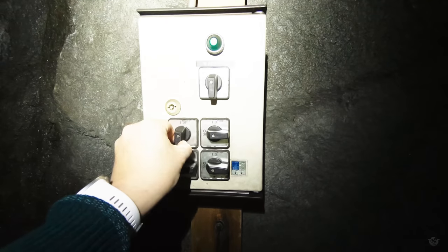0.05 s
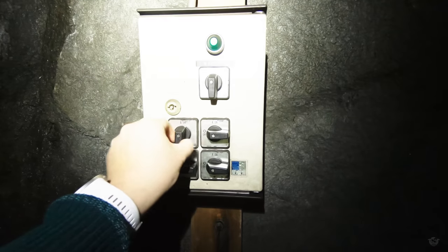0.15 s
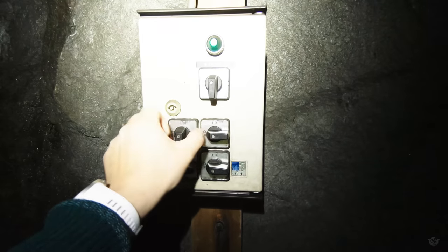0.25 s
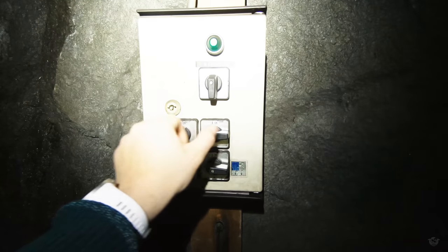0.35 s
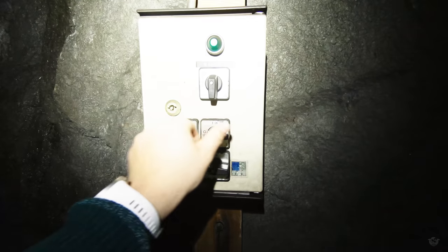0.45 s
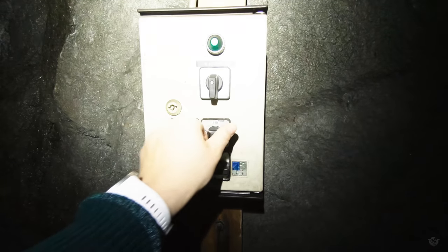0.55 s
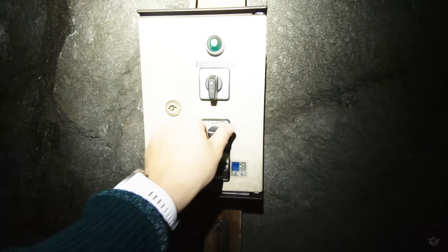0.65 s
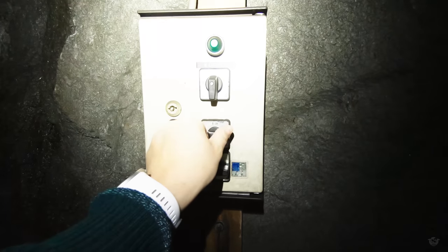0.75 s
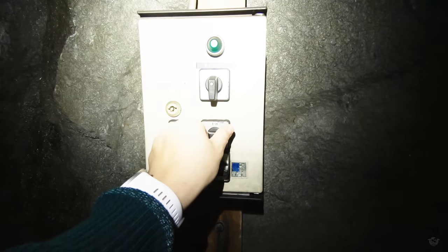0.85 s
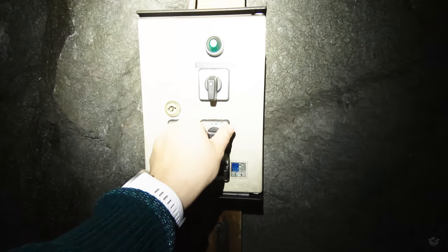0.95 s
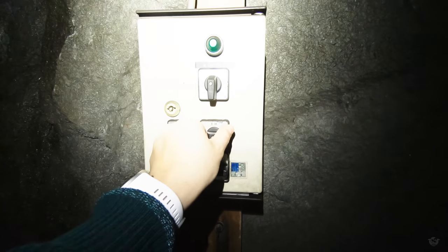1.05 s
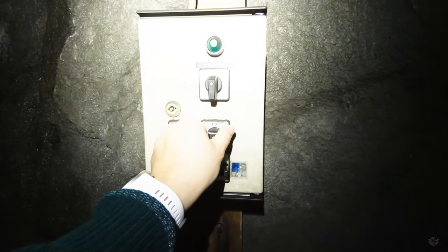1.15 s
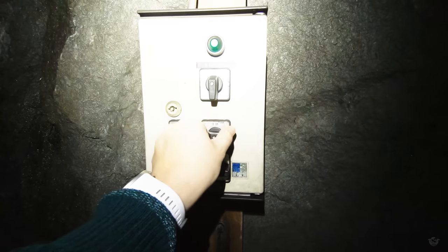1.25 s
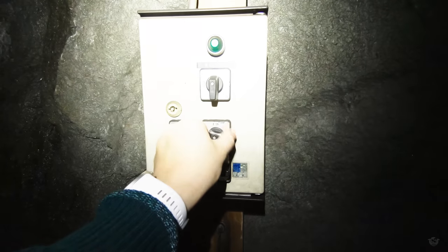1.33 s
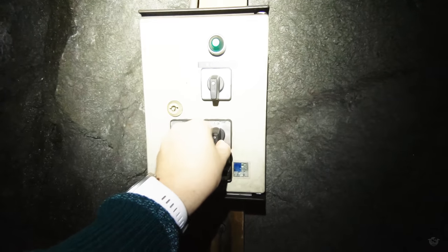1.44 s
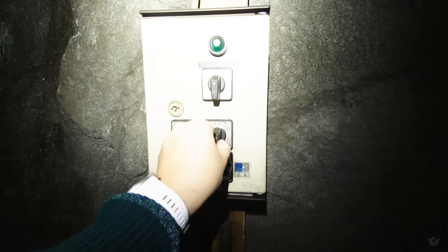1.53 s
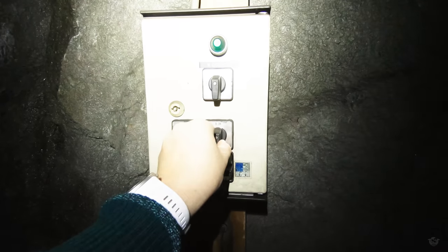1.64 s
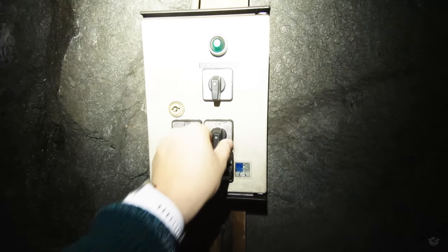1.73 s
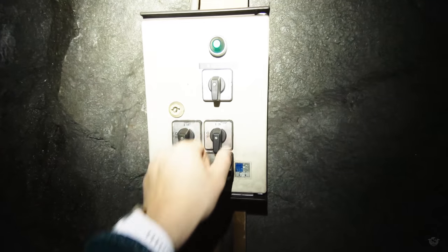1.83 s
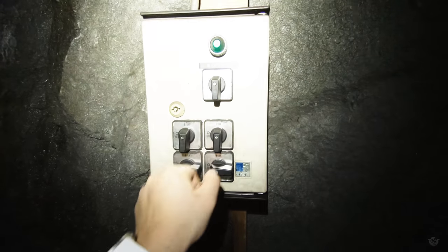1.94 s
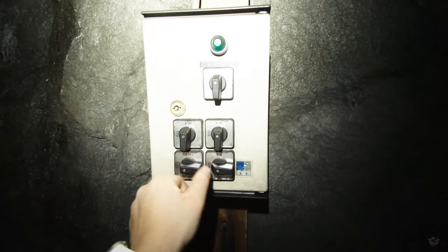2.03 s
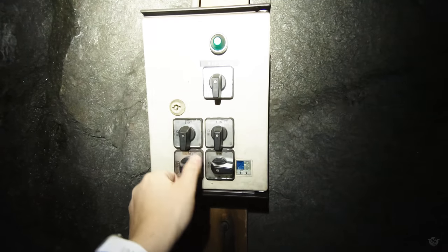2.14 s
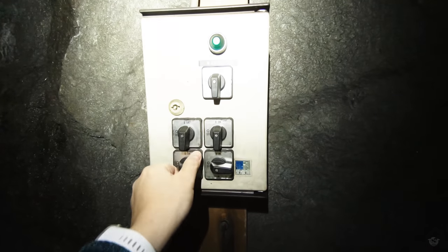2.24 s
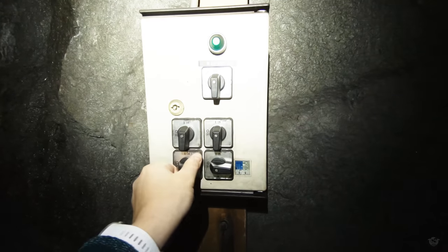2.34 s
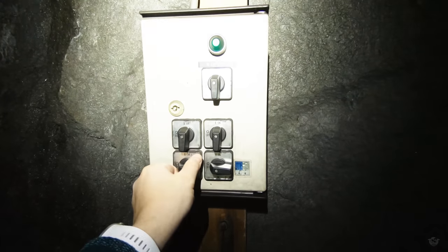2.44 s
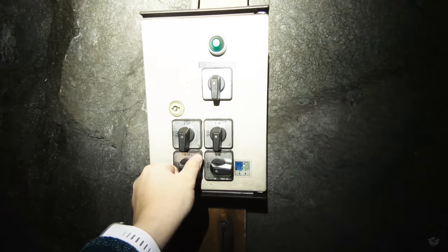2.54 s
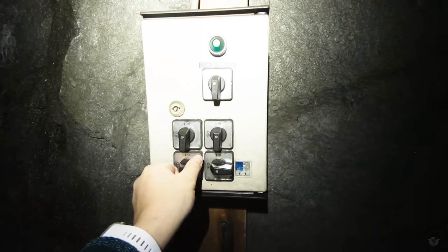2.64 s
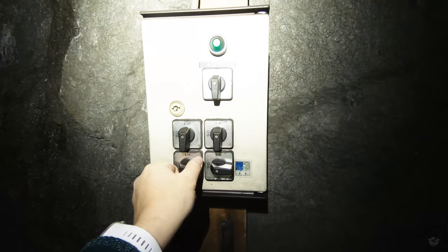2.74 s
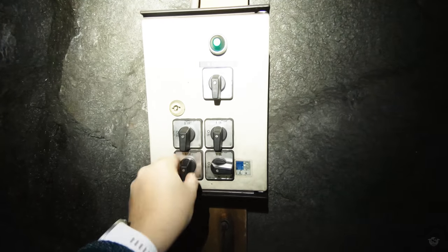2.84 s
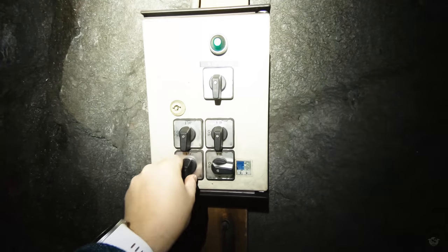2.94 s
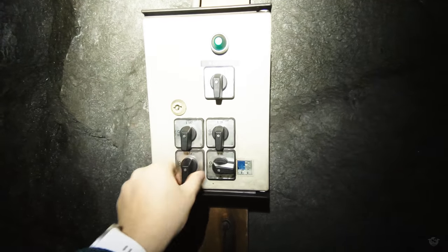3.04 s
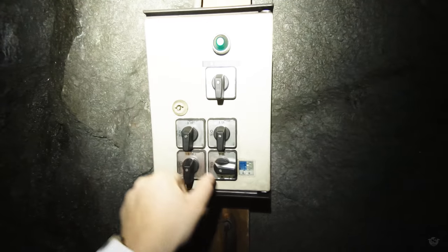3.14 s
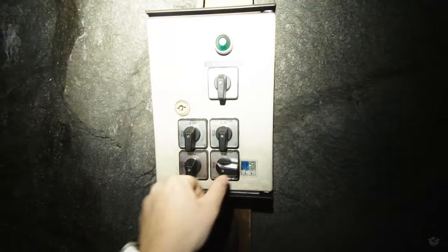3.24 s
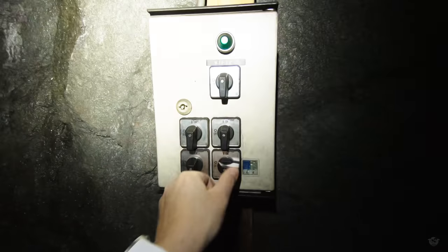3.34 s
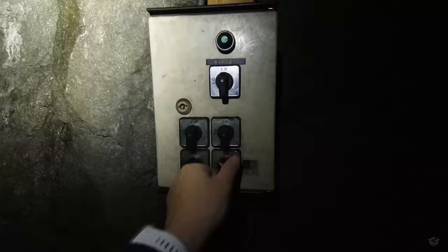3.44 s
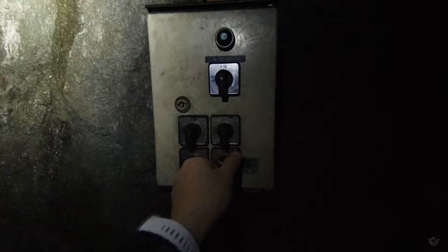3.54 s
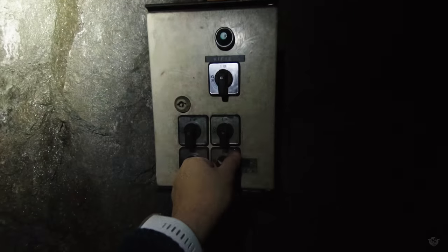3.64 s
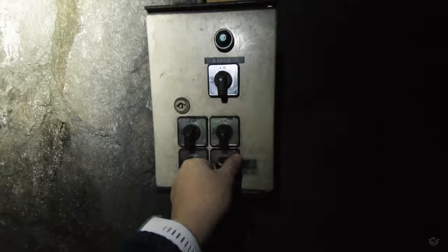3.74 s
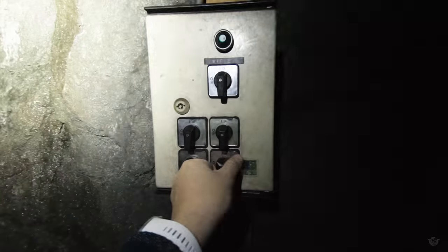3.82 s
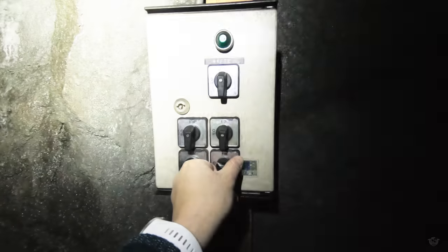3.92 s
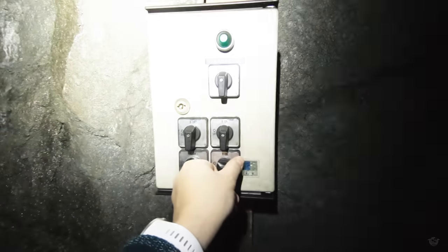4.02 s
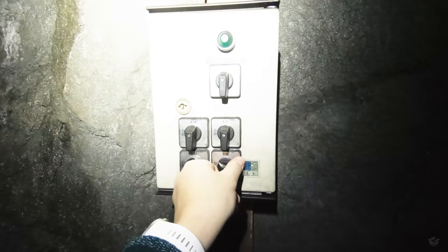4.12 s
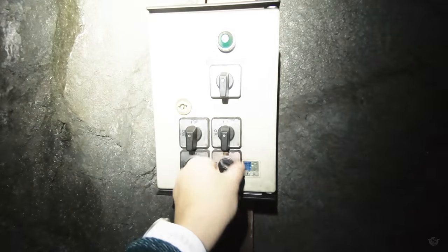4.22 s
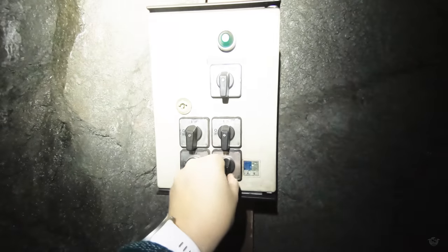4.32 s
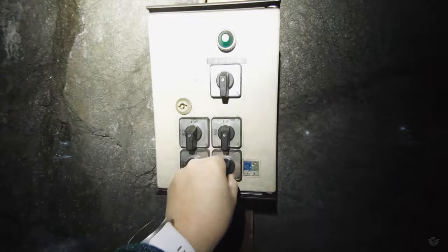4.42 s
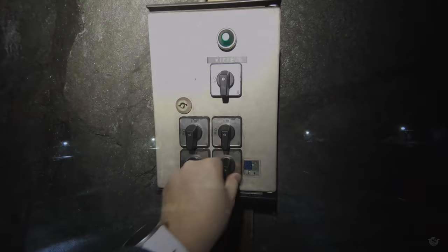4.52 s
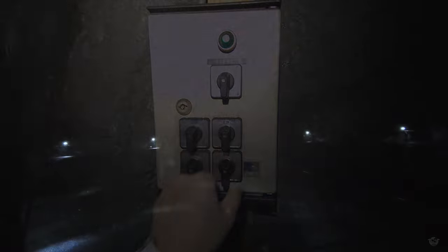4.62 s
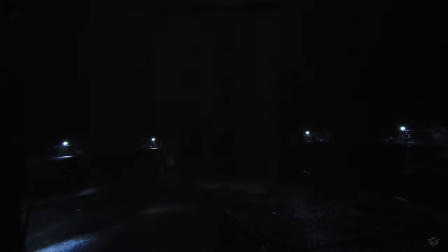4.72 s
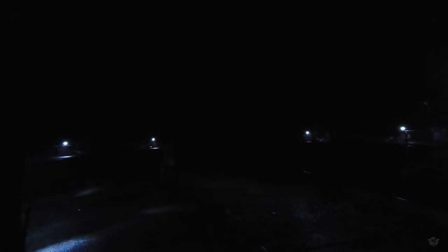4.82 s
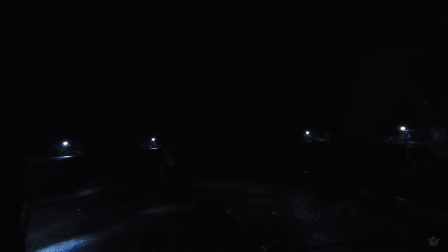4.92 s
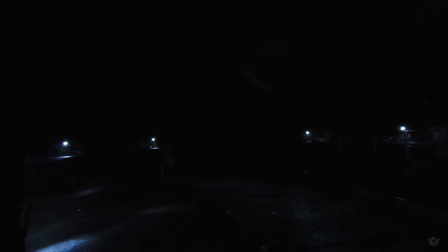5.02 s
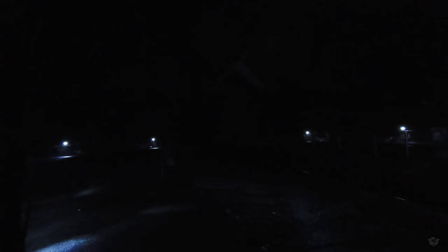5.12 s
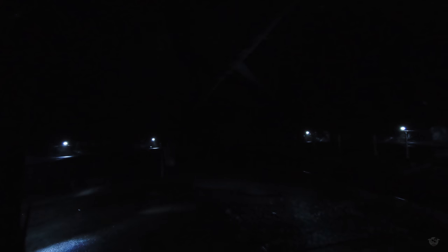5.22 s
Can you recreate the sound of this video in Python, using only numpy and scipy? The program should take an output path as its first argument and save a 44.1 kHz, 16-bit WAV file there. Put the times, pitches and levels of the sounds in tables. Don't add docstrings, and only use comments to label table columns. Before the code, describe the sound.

Three sharp rotary switch clacks on a steel box ring through a rock tunnel, over low air rumble, before a shoe scuffs grit.

```python
import sys
import numpy as np
from scipy import signal
from scipy.fft import rfft, irfft
from scipy.io import wavfile
from scipy.ndimage import uniform_filter1d

SR = 44100
rng = np.random.default_rng(int(sys.argv[2]) if len(sys.argv) > 2 else 0)


def unload_audio(sound):
    columns = np.transpose(np.atleast_2d(sound))
    steps = np.round(np.clip(columns, -1, 1) * 32767)
    wavfile.write(sys.argv[1], SR, steps.astype(np.int16))


def nominal_scale(level):
    x = np.asarray(level, float) / 20
    return 10 ** x


N = 232460
LEAD = 8820

# (time [s], rattle level [dB], thump level [dB], wall throb level [dB], tunnel hiss level [dB])
SNAPS = [
    (-.087, -11, -32, -31, -45.5),
    (1.4885, -15, -18.5, -35.5, -47.5),
    (2.9122, -15.5, -16.5, -29.5, -46.5),
    (4.3402, -14, -19, -42.5, -53),
]
# (rattle decay [s], thump pitch [Hz], throb pitch [Hz], nearest wall level [dB], throb fade [dB/s])
SWITCHES = [
    (0.0049, 207, 121.4, -40, -11.5),
    (0.011, 210, 122, -23, 3),
    (0.0082, 193, 117.6, -33.5, -9),
    (0.01, 165, 115, -33.5, -12),
]
# (frequency [Hz], peak level [dB], t60 [s], delay [s])
UPPER_RIGHT = [(658, -13.5, 0.04, 0.002345), (981, 5, 0.012, 0.00087), (1130, -20, 0.025, 0.0017),
               (1307, 1, 0.012, 0.00238), (1590, -10, 0.014, 0.0012), (1924, 5.5, 0.01, 0.00095),
               (2270, -3, 0.01, 0.0005), (2900, -11.5, 0.037, 0.002), (3600, 4, 0.0072, .0015),
               (4170, 0.5, 0.0093, 0.001317), (4580, -10.5, 0.0097, 0.00096), (5054, -2.5, 0.011, 0.00026),
               (6060, -10.5, 0.0086, 0.00016), (6920, -5, 0.0065, 0.00022), (9100, -3, 0.0059, 0.00036),
               (10260, -4.5, 0.0063, 0.000397), (12200, -11, 0.0043, 0.000366)]
LOWER_LEFT = [(617, -12.5, 0.059, 0.00299), (823, 2.5, 0.022, 0.00216), (1265, -21, 0.11, 0.00081),
              (1410, 5, 0.015, 0.00106), (2235, -19, 0.013, 0.00096), (2830, -14, 0.032, 0.000905),
              (3210, -9.5, 0.015, 0.00162), (3780, -2.5, 0.012, 0.00202), (4400, -2, 0.013, 0.000943),
              (5230, 7, 0.0048, 0.0004), (6440, 2, 0.0061, 0.00036), (7170, -13, 0.0069, 0.0051),
              (8860, -17.5, 0.0046, 0.000291), (10160, -1.5, 0.0033, 0.000406),
              (13500, -26.5, 0.0045, .0004)]
LOWER_RIGHT = [(430, -17, 0.047, 0.00407), (626, -11, 0.021, 0.00252), (950, -10.5, 0.02, 0.00181),
               (1313, -9.5, 0.031, 0.00142), (780, -10.5, 0.024, 0.0024), (1063, -19, 0.065, 0.002),
               (1440, -3.5, 0.017, 0.0013), (2190, 3, 0.008, 0.001175), (2900, 1, 0.0071, 0.0005),
               (3800, -5.5, 0.01, 0.00055), (4630, -6.5, 0.016, 0.0014), (5470, 8, 0.006, 0.000218),
               (6440, -5, 0.0041, 0.000313), (7450, -9.5, 0.0051, 0.00073), (9650, -1, 0.0046, .0006),
               (13400, -20, 0.0044, 0.000865)]
# (frequency [Hz], density [dB/Hz])
CRACK = [(240, 4), (400, -9), (1330, -4.5), (2520, -6.5), (3680, -13.5), (5380, -18), (6860, -22),
         (7740, -22.5), (10300, -22.5), (13800, -86), (15100, -74)]

# (frequency [Hz], t60 [s], level [dB])
LID_MODES = [(63.96, 1, -47.5), (250.5, 0.136, -37), (322.6, .7, -48), (330.7, 0.16, -41.5),
             (480, .03, -37)]
LID_HIGH_DB = [10, 4, -9, -5]

# (delay [s], length [s], level relative to the snap's throbs [dB])
WALLS = [(0.06, 0.07, 3.7), (0.091, 0.045, -0.5), (0.117, .065, 2.2), (0.166, .06, -12),
         (0.255, 0.1013, -6.5), (0.33, 0.067, -10), (0.393, 0.11, -22), (.53, 0.13, -24)]
NEAR_WALL_S, NEAR_THROB_S = 0.01883, .033
# (frequency [Hz], t60 [s])
TUNNEL_T60 = [(60, 2.84), (250, 1.11), (700, 1.94), (2000, 1.95), (5000, 1.58), (9000, 0.59), (14000, 0.66)]
# (frequency [Hz], density [dB/Hz])
RETURN = [(88, -11.5), (150, -1), (200, -7.5), (330, -9), (560, -22.5), (2400, -23.5), (10300, -29.5),
          (12500, -54)]
# (frequency [Hz], width [octaves], level [dB])
RETURN_RINGS = [
    [(307, 0.23, 1.5), (1360, 0.2, 5), (3800, 0.48, -4), (5240, 0.19, 4)],
    [(310, .15, 10), (4000, .4, -3.5), (5110, .14, 6), (9500, 0.12, 5.5)],
    [(325.7, 0.23, 4.5), (680, .25, 3.5), (1850, 0.21, 7), (3270, 0.18, 1)],
    [(213, .3, 0.5), (762, 0.21, 6), (1590, 0.23, 6)],
]
# (delay [s], length [s], level [dB])
SWELLS = [
    (.075, 0.04, 3.5),
    (.25, .2, 1),
]

# (time [s], peak level [dB], centre [Hz], width [octaves])
TICKS = [(.4434, -59, 1093, .78), (1.3322, -44.5, 8700, 0.39), (1.333, -47, 1900, 1.1),
         (1.3662, -42, 4640, 0.68), (1.367, -46.5, 1900, 1.07), (1.478, -51, 9500, 0.35),
         (1.479, -42.5, 790, .84), (1.5182, -33.5, 790, .82), (1.519, -32.5, 2015, 0.44),
         (2.8661, -43.5, 3700, .73), (2.868, -48, 989, .85), (2.902, -56.5, 7030, 0.64),
         (4.2807, -45, 4200, .8), (4.282, -47.5, 905, 1.5), (4.33, -46, 7000, .6), (4.63, -60, 8000, .6),
         (4.8943, -46, 2100, 0.5), (4.92, -41, 2740, 0.15)]
TICK_T60_S, TICK_T60_SLOPE = 0.033, .6
BOX_PAN_DB, TICK_PAN_DB = -1.1, -0.5

# (peak time [s], rise [s], fall [s], scrape level [dB], fine grit level above the scrape [dB])
SHOE = [
    (4.535, .02, .07, -77.5, 2.5),
    (4.637, 0.0085, .08, -70, -11),
    (4.82, 0.11, 0.045, -74, -5.5),
    (4.9, .012, 0.024, -71, -8),
    (4.914, .005, 0.02, -74.5, 17),
    (4.988, 0.049, 0.07, -51, -7),
    (5.13, 0.18, .35, -66, -36),
]
SHOE_EDGE_DB = -12.5
# (frequency [Hz], density [dB/Hz])
SCRAPE = [(410, -42), (700, -10), (886, -28), (1010, -14.5), (2080, -8), (3600, -5), (9000, -27),
          (13500, -49), (19800, -120)]
# (frequency [Hz], density [dB/Hz])
GRIT = [(3530, -19), (6000, -4), (7320, -4.5), (8180, -13), (10500, -0.5), (14200, -24), (14700, -33),
        (15000, -65)]

# (frequency [Hz], density [dB/Hz])
AIR = [(12, -23.5), (20, -15), (39, -5.5), (74, -14.5), (111, -12), (147, 2), (249, -4), (337, -12.5),
       (525, -21.5), (796, -14.5), (1110, -22.5), (1460, -22.5), (2620, -29.5), (7000, -33), (8200, -44.5),
       (11900, -49), (12600, -65)]
AIR_DB = -58
# (time [s], length [s], level [dB])
DRAUGHTS = [
    (.45, 0.313, 7),
    (.95, .4, -2),
    (1.3, .3, -2),
    (2.0, .2, 2),
    (2.8, 0.55, -2.5),
    (3.58, 0.11, 3),
    (3.75, 0.18, -9.5),
    (3.93, .15, -1.5),
    (4.9, 0.29, 8.5),
    (5.2, .2, 5),
]
# (time [s], length [s], level [dB])
RUSTLES = [(.6, 0.5, 6), (1.25, 0.42, 4.5), (1.95, .4, 5), (3.55, 0.44, 4), (4.05, .35, 2.5),
           (4.8, 0.21, 11), (5.25, 0.17, 9)]

# (frequency [Hz], left-right correlation [-1 to 1])
SAME = [(60, 0.87), (130, 0.72), (290, 1), (630, -0.072), (1390, -0.22), (3050, 0.33), (6680, -0.084),
        (14700, -0.45)]
# (frequency [Hz], left port leads by [cycles])
PORT_LEAD = [(300, 0), (850, .03), (1100, .14), (1450, .18), (2100, .4), (2900, .73), (3700, 1.1),
             (4300, 1.05), (10000, 1.06)]
# (frequency [Hz], left minus right [dB])
PORT_SHADE = [(500, 0), (1100, -4), (1450, -1), (2100, 2), (2900, -5), (4300, -2), (6500, -4), (9000, -6),
              (12000, -7)]


def switches():
    out = np.zeros((2, N + LEAD + 65000))
    bodies = LOWER_LEFT, UPPER_RIGHT, LOWER_LEFT, LOWER_RIGHT
    for k, (s, db, thump_db, walls_db, hiss_db) in enumerate(SNAPS):
        decay, thump_hz, throb_hz, near_db, fade_db = SWITCHES[k]
        near = nominal_scale(db) * rattle(bodies[k], decay)
        far = nominal_scale(db) * rattle(bodies[k], decay)
        add(out, s, placed(near, far, BOX_PAN_DB))
        add(out, s, lid(thump_hz, thump_db, LID_HIGH_DB[k]))
        add(out, s, nominal_scale(hiss_db) * tunnel(RETURN_RINGS[k]))
        near_start = s + NEAR_WALL_S - NEAR_THROB_S / 2
        add(out, near_start, nominal_scale(near_db) * throb(throb_hz, NEAR_THROB_S))
        for delay, length, wall_db in WALLS:
            level = nominal_scale(walls_db + wall_db + fade_db * delay)
            add(out, s + delay - length / 2, level * throb(throb_hz, length))
    return out[:, LEAD:LEAD + N]


def rattle(modes, decay):
    t = np.arange(4096) / SR
    rings = np.zeros(4096)
    for hz, db, t60, delay in modes:
        u = np.maximum(t - delay, 0)
        envelope = nominal_scale(db - 60 * u / t60) * (1 - np.exp(-.8 * hz * u))
        rings += envelope * np.sin(2 * np.pi * (hz * u + rng.random()))
    crack = evened(colour(rng.standard_normal(4096), CRACK)) * (1 - np.exp(-t / 0.00057))
    chatter = nominal_scale(-28 - 60 * t / .035)
    body = 0.81 * rings + crack * (nominal_scale(-6.5) * np.exp(-t / (.5 * decay)) + chatter)
    return signal.lfilter(*signal.butter(2, 250, "high", fs=SR), body)


def lid(thump_hz, thump_db, high_db):
    t = np.arange(40000) / SR
    sound = nominal_scale(thump_db - 60 * t / 0.035) * np.sin(2 * np.pi * thump_hz * t)
    for hz, t60, db in LID_MODES:
        sound += nominal_scale(db + high_db * (hz > 300) - 60 * t / t60) * np.sin(2 * np.pi * hz * t)
    soft_start = 1 - np.exp(-(t / 0.002475) ** 2)
    return signal.lfilter(*signal.butter(2, 55, "high", fs=SR), sound * soft_start)


def throb(hz, length):
    u = np.arange(0, length, 1 / SR)
    pitch = hz * rng.uniform(0.92, 1.048)
    return np.sin(np.pi * u / length) ** 2 * np.sin(2 * np.pi * (pitch * u + rng.random()))


def tunnel(rings):
    def db_at(hz, t):
        octave_rings = [(np.log2(f), 2 * width, db) for f, width, db in rings]
        tint = bumps(octave_rings, np.log2(hz + 1))
        unanswered = 2.6 / (1 + np.exp(np.minimum(t - .034, .1) / 0.001031))
        return tint - 60 * t / read(TUNNEL_T60, hz) + bumps(SWELLS, t) - unanswered
    size = 60000
    tail = colour(diffuse(size, db_at, patchy_db=.6), RETURN)
    fade = signal.windows.tukey(size, .01) * np.linspace(1, 0, size) ** .3
    return tail / np.std(tail[:, 2000:14000]) * fade


def ticks():
    out, t = np.zeros((2, N + LEAD)), np.arange(2048) / SR
    for s, db, hz, width in TICKS:
        hump = [(hz / 8 ** width, -60), (hz / 2 ** width, -8), (hz, 0),
                (hz * 2 ** width, -10), (hz * 8 ** width, -70)]
        t60 = TICK_T60_S * (1e3 / hz) ** TICK_T60_SLOPE
        envelope = nominal_scale(-60 * t / t60) * (1 - np.exp(-t / 0.00047))
        near, far = envelope * colour(rng.standard_normal((2, 2048)), hump)
        add(out, s, nominal_scale(db) * placed(near, far, TICK_PAN_DB) / abs(near).max())
    return out[:, LEAD:]


def shoe():
    t = np.arange(N) / SR
    grains = nominal_scale(2.0 * evened(uniform_filter1d(rng.standard_normal(N), size=150)))
    bed = grains * diffuse(N, lambda hz, t: 0 * hz * t, patchy_db=1.2)
    scrape_level, grit_level = np.zeros(N), np.zeros(N)
    for s, rise, fall, db, grit_db in SHOE:
        move = nominal_scale(db + SHOE_EDGE_DB * np.maximum((s - t) / rise, (t - s) / fall))
        scrape_level += move
        grit_level += move * nominal_scale(grit_db)
    scrape = evened(colour(bed, SCRAPE)) * scrape_level
    grit = evened(colour(bed, GRIT)) * grit_level
    return nominal_scale(5.5) * (scrape + grit)


def air():
    def db_at(hz, t):
        low = 1 / (1 + (hz / 200) ** 4)
        high = 1 / (1 + (1800 / (hz + 1)) ** 4)
        return low * bumps(DRAUGHTS, t) + high * bumps(RUSTLES, t)
    return nominal_scale(AIR_DB) * evened(colour(diffuse(N, db_at, patchy_db=1.0), AIR))


def diffuse(size, db_at, patchy_db=1.0):
    frames, hz = size // 128 + 5, np.fft.rfftfreq(512, 1 / SR)[:, None]
    a, b, c, d, patches = rng.standard_normal((frames, 257, 5)).T
    patches = uniform_filter1d(patches, size=6, axis=0)
    patches = evened(uniform_filter1d(patches, size=20, axis=1))
    same = np.clip(read(SAME, hz), -1, 1)
    left, other = a + 1j * b, c + 1j * d
    z = np.array([left, same * left + np.sqrt(1 - same ** 2) * other])
    z *= nominal_scale(db_at(hz, np.arange(frames) * 128 / SR) + patchy_db * patches)
    return signal.istft(z, nperseg=512, noverlap=384)[1][:, :size]


def placed(near, far, pan_db):
    size = len(near)
    hz = np.fft.rfftfreq(size, 1 / SR)
    later = irfft(rfft(near) * np.exp(-2j * np.pi * read(PORT_LEAD, hz)), size)
    shaded = colour(.94 * near + .33 * far, PORT_SHADE)
    pan_db = np.clip(pan_db, -3, 1)
    quiet_end = np.arange(size) < size - 256
    return quiet_end * np.array([shaded, later]) * nominal_scale(np.array([[pan_db], [-pan_db]]) / 2)


def add(mix, s, sound):
    part = mix[..., round(s * SR) + LEAD:][..., :sound.shape[-1]]
    part += sound[..., :part.shape[-1]]


def colour(x, points):
    size = x.shape[-1]
    return irfft(rfft(x) * nominal_scale(read(points, np.fft.rfftfreq(size, 1 / SR))), size)


def read(points, hz):
    f, value = np.transpose(points)
    return np.interp(np.log(hz + 1), np.log(f + 1), value)


def bumps(rows, at):
    return sum(db * np.exp(-((at - centre) / (.5 * width)) ** 2) for centre, width, db in rows)


def evened(x):
    return x / np.sqrt(np.mean(x ** 2) + 1e-20)


def scene():
    return switches() + ticks() + air() + shoe()


def top_cut(x):
    return signal.sosfilt(signal.butter(12, 15260, fs=SR, output="sos"), x)


def record(dry):
    limited = signal.oaconvolve(dry, signal.firwin(127, 15000, fs=SR)[None], "same")
    return top_cut(limited)


dry = scene()
out = record(dry)
unload_audio(out)
```